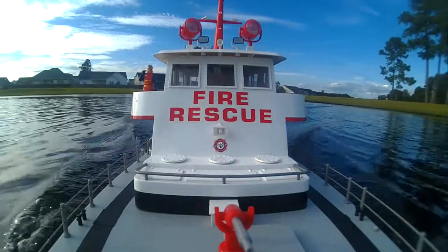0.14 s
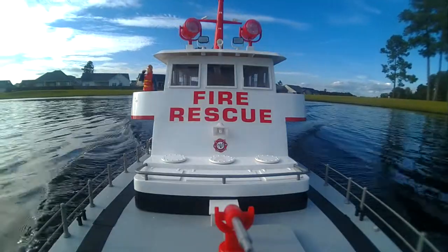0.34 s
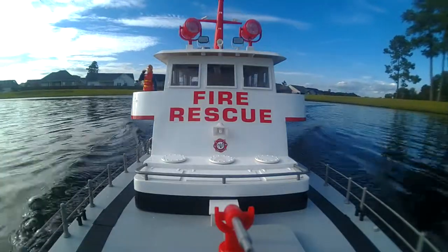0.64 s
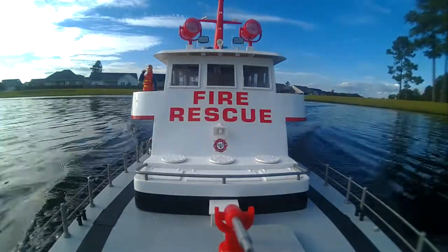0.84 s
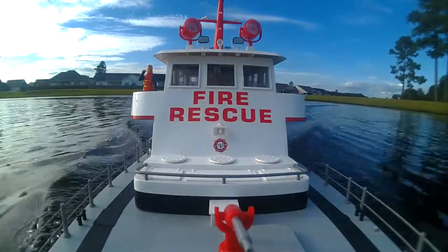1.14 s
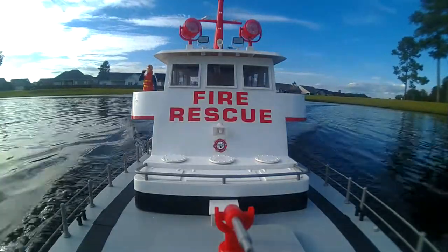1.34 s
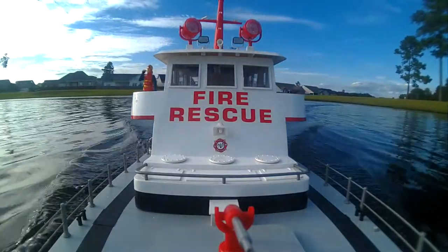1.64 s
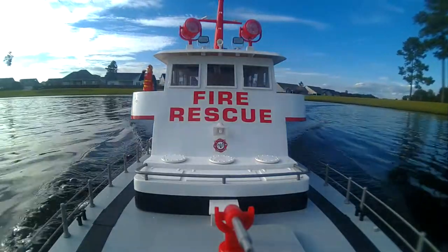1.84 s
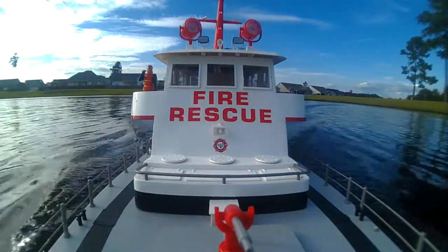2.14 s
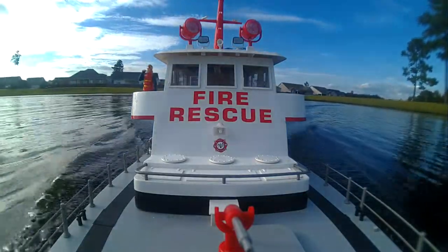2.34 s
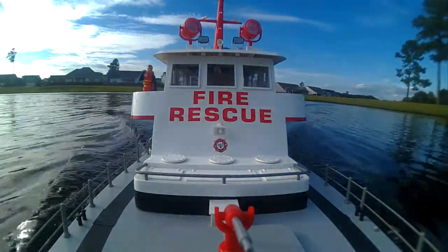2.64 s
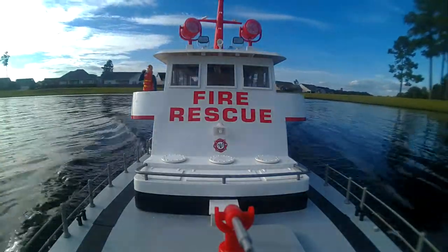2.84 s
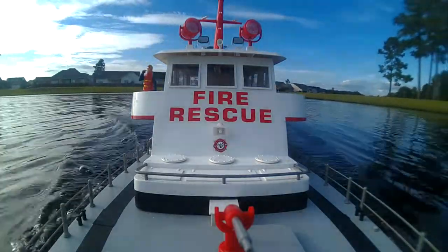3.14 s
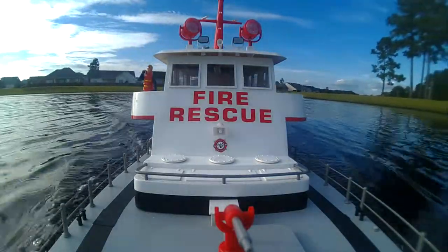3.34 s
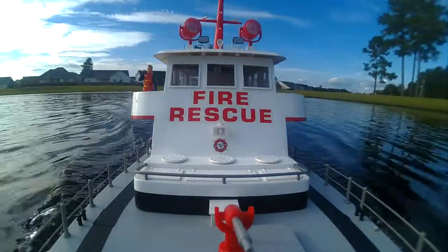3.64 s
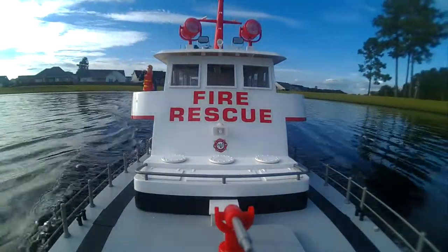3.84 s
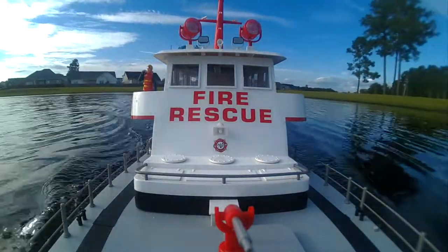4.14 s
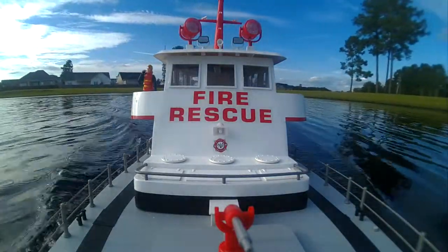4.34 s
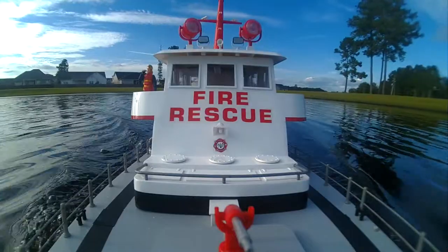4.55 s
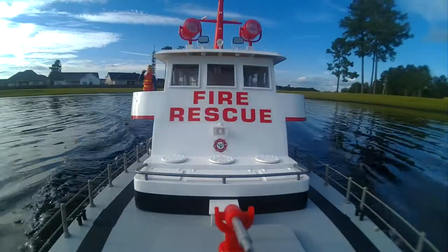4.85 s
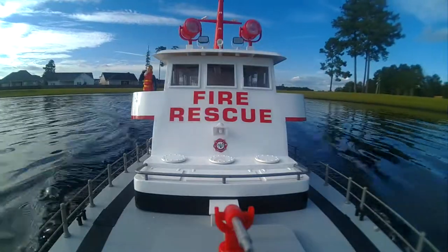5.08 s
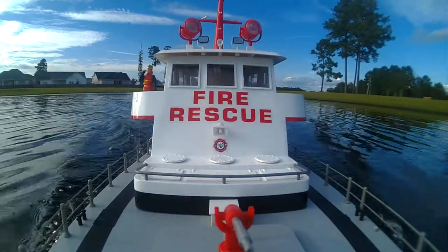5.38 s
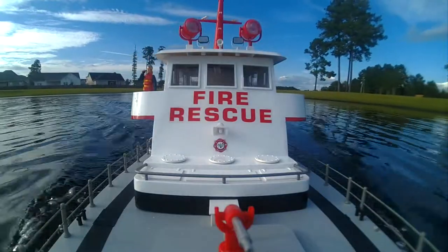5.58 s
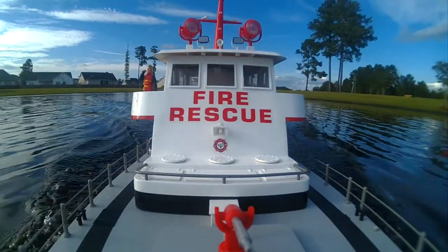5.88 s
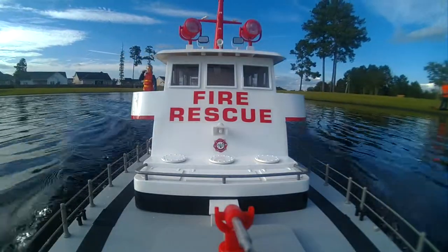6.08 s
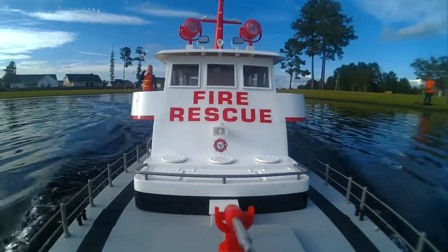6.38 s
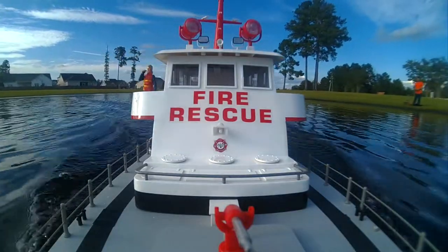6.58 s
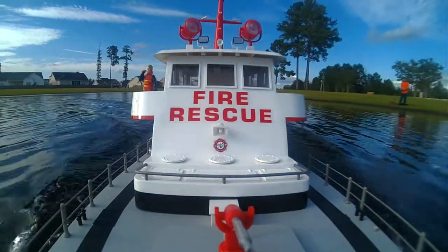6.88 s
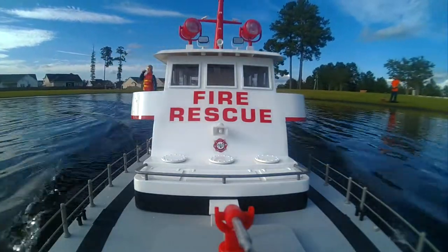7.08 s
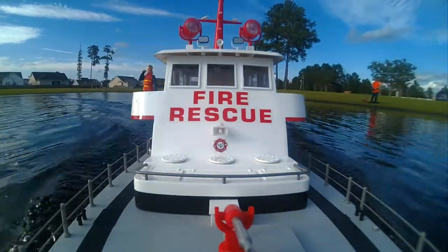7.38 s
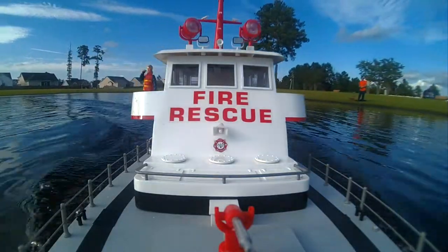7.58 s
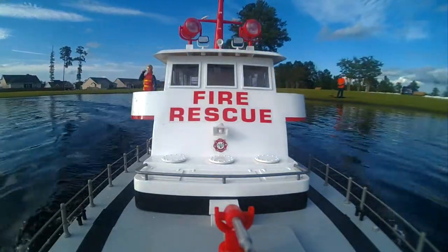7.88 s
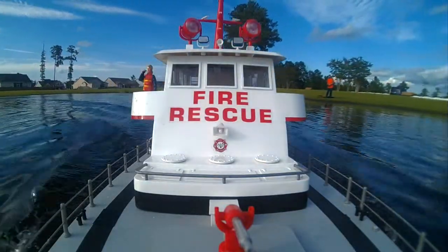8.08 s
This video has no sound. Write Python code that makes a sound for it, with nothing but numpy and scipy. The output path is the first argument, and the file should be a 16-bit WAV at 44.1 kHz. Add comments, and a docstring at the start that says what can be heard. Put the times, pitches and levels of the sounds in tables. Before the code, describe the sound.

A very close, dry outdoor sound from the deck of a model boat moving on a pond. From 0 to 1.7 seconds a small electric motor runs at steady low speed: a piercing fixed whine near 2 kHz, a buzzing hum around 90 turns per second, brushy hiss, and even metallic chatter in short spells, with a few hard knocks between 0.7 and 0.95. From about 1.75 the throttle opens; the hum rises, peaking near 2.7 to 3 seconds with a low boom, while the whine keeps its pitch and softens somewhat. The rattle turns loose and ragged, with irregular hard knocks. A faint drop ticks at 2.6. From 3.4 to 7.5 the speed settles slightly lower, wavering, still rattling and knocking over gently surging water wash. Near 8 seconds the hum climbs again as the sound ends, still running.

```python
"""An evenly chattering shaft and a steady whine are heard first, on the deck of a model boat on a pond.
As the throttle opens around two seconds, the hum rises and the rattle turns loose, with hard knocks.
Rattle and knocks are impulses and scraping noise sent through hull resonances; the whine is a fixed
chopping tone with commutator sidebands; hums are sines locked to the shaft's turns.
Noise shaped in colour and slowly varied in level gives water along the sides; one drop hits the deck."""
import sys
import numpy as np
from scipy import signal
from scipy.fft import rfft, irfft, next_fast_len
from scipy.io import wavfile
from scipy.ndimage import uniform_filter1d

SR = 44100
rng = np.random.default_rng(int(sys.argv[2]) if len(sys.argv) > 2 else 0)


def transcribe(signal):
    """Save signal, clipped to [-1, 1], as a 16-bit WAV file at the path in sys.argv[1]."""
    frames = np.atleast_2d(signal).T
    limited = np.clip(frames, -1, 1)
    pcm = np.round(limited * 32767).astype(np.int16)
    wavfile.write(sys.argv[1], SR, pcm)


N = 362502
TIME = np.arange(N) / SR   # s
SIZE = 2 * next_fast_len(N // 2 + 8192)   # transform length, with room for ringing
BINS = np.maximum(np.arange(SIZE // 2 + 1) * SR / SIZE, 1)   # Hz

# faint electronic hiss, relative density: frequency_hz, level_db (per Hz)
HISS_SPECTRUM = [(5000, -13), (6000, -25), (6700, -2), (8000, -20), (10000, -0.5), (13000, 0), (15500, -4)]
# water and air along the hull, relative density: frequency_hz, level_db (per Hz)
WASH_SPECTRUM = [(25, -15), (42, -12), (60, -1), (80, -6.5), (140, -9), (220, 6), (280, -18.5), (390, 5),
                 (480, -4), (750, 2.5), (1800, -0.5), (2400, -6), (3700, -16), (5500, -53.5)]
# a drop hits the deck: time_s, peak_db
DECK_DROPS = [(2.6135, -40)]
# wavering tones of the drive line, off the shaft's orders:
# multiple (of the shaft rate), low_speed_db, cruise_db
DRIVE_LINE_TONES = [(2.44, -64, -65), (3.06, -71, -63), (3.27, -68, -56), (3.48, -60, -57.5),
                    (3.71, -55, -55.5)]
# resonances of the motor can, relative levels: centre_hz, width_hz, level_db
CAN_MODES = [(2543, 180, -15), (2625, 90, -2), (2722, 89, 3.5), (2860, 180, -11.5), (3140, 140, -13),
             (3377, 150, -11.5), (3714, 220, -22), (4365, 180, -33.5), (4700, 360, -37)]
# brief swells of the rubbing: centre_s, half_length_s, rise_db
RUBBING_SWELLS = [(.81, .04, 2.5), (3.181, .09, 3.5)]
# rotation of the shaft: time_s, speed_turns_per_s
SHAFT_SPEED = [(0.1, 88.5), (0.16, 88.4), (1.21, 88.4), (1.43, 89.6), (1.73, 89.6), (1.86, 93.7),
               (2.11, 96.9), (2.5, 99.8), (2.7, 103.3), (2.99, 102.8), (3.4, 98.8), (3.79, 98.8),
               (4.01, 97.0), (4.69, 96.9), (5.39, 99.3), (5.91, 97.8), (6.5, 97.0), (7.5, 98.1),
               (8.15, 102.4), (8.22, 102.1)]
# once-a-turn hum of the unbalance: speed_turns_per_s, level_db
UNBALANCE_LEVEL = [(95.5, -51), (97.5, -60), (99, -60.5), (101, -57.5)]
# higher shaft orders: multiple (of the shaft rate), low_speed_db, cruise_db, chatter_rise_db
SHAFT_ORDERS = [(3, -70, -74, 0), (4, -57, -69, 0), (6, -72, -61, 5.5), (7, -68, -58, 0), (8, -62, -68, 12),
                (9, -50.5, -50, 0), (10, -55, -64, 2), (12, -52, -53, 7), (15, -44, -49, 11),
                (17, -47, -54, 5), (31, -58, -60, 9)]
# level of the controller's chopping tone: time_s, level_db
WHINE_LEVEL = [(0.05, -31.5), (1.48, -31), (2.57, -34), (3.51, -38.5), (3.6, -36), (5.65, -35), (7.38, -36),
               (8.22, -39.5)]
# commutation sidebands of the whine:
# multiple (of the chopping rate), offset (shaft orders), low_speed_db, cruise_db
WHINE_SIDEBANDS = [(1, -3, -44, -42.5), (1, -2, -56, -55), (1, -1, -60.5, -63), (1, 2, -59.5, -52),
                   (1, 3, -56, -62.5), (2, -3, -60.5, -58.5), (2, -2, -84, -69.5), (2, -1, -80, -76.5),
                   (2, 2, -91.5, -77.5)]
# spells at low speed that catch the shaft in even chatter: start_s, end_s, rattle_rise_db
CHATTER_SPELLS = [(-.03, .022, 4.6), (.1, .43, 3.9), (.515, .66, 4.4), (.69, .955, 4.2), (1.03, 1.21, 5.5),
                  (1.3, 1.55, 5.5), (1.61, 1.82, 4.4)]
# resonances of hull and motor mount, relative levels: centre_hz, width_hz, level_db
HULL_MODES = [(317, 35, -20), (693, 232, -20.5), (820, 210, -25.5), (1016, 60.4, -5), (1164, 220, -14),
              (1278, 90, -3.5), (1351.7, 114, 2.5), (1446, 110, -3.5), (1606, 140, -22.5),
              (1891, 98, -21.5), (2160, 120, -25), (2726, 190, -20), (3160, 410, -25), (4810, 630, -50)]
# the hardest knocks of the shaft on its tube: time_s, peak_db
HARD_KNOCKS = [(0.6953, -14), (0.7928, -10), (0.8934, -12), (0.9412, -11.5), (1.914, -16), (1.9553, -12.5),
               (2.0847, -12.5), (2.137, -16), (2.717, -15), (3.0363, -16), (3.5573, -17), (3.6592, -18),
               (3.8014, -13.5), (3.995, -14), (4.0866, -17.5), (4.1584, -16), (4.2, -17), (4.3126, -18.5),
               (4.353, -17), (4.3848, -15), (4.755, -15.5), (4.9181, -13.5), (5.2227, -16.5), (5.2545, -17),
               (5.3652, -15), (5.8711, -19.5), (6.2103, -16.5), (6.4651, -14), (6.506, -18), (6.8561, -17),
               (6.9062, -16.5), (6.9972, -18), (7.0295, -17), (7.0587, -16)]

CHOP_HZ, WHISTLE_HZ, CUTOFF_HZ = 1943.5, 14800, 15700
# as it speeds up the shaft works loose, rattles worst, then runs smoother (turns per s)
LOOSENS_AT, LOOSE_AT, ROUGHEST_AT, SMOOTH_AT = 90, 96, 97.5, 101
# the propeller's twice-a-turn hum, and its boom at a resonance of the deck
BLADE_DB, BOOM_DB, BOOM_HZ, BOOM_WIDTH_HZ = -55.5, -34, 203.5, 16.5
# octave of the whine at low and at cruising speed
OCTAVE_DB, OCTAVE_CRUISE_DB = -62.5, -55.5
# the loose rattle, and its fall past the roughest rate (dB per turn per s)
RATTLE_DB, SMOOTHING_DB = -28, 0.5
# rubbing of brushes and bearings, and its rise during chatter
RUB_DB, RUB_CHATTER_DB = -38, 2
# chance knocks once the shaft is fully loose: rate (per s), peak level before smoothing
KNOCKS_PER_S, KNOCK_DB = 3.0, -20
# lag of the chatter behind the shaft in a spell: mean and spread (turns per s)
CHATTER_LAG, CHATTER_WANDER = .55, .35


def from_db(db):
    """Logarithmic level: decibels become an amplitude gain."""
    return 10 ** (np.asarray(db) / 20)


def rms_one(x):
    """Normalization: a signal is scaled to unit mean power."""
    return x / np.sqrt(np.mean(x ** 2) + 1e-20)


def evened(x):
    """Short-time normalization: unit power over a fifth of a second leaves single blows standing."""
    return x / np.sqrt(uniform_filter1d(x ** 2, size=SR // 5) + 1e-12)


def in_time(rows):
    """Linear interpolation: the second column of a curve at every sample."""
    time_s, values = np.transpose(rows)
    return np.interp(TIME, time_s, values)


def drift(corner_hz):
    """Low-passed chance: white noise through two equal poles wanders slowly, with spread 1."""
    step = 40   # samples between the computed points
    pole = np.exp(-2 * np.pi * step * corner_hz / SR)
    noise = rng.standard_normal(N // step + 2002)
    slow = signal.lfilter([1], [1, -2 * pole, pole * pole], noise)[2000:]   # settled part
    return np.interp(np.arange(N) / step, np.arange(len(slow)), rms_one(slow))


def between(low_db, cruise_db, cruise):
    """Linear blend: a level moves from its low-speed to its cruising value."""
    return low_db + cruise * (cruise_db - low_db)


def tone(level_db, cycles):
    """Sinusoid: its phase is counted in cycles and its level is effective (rms)."""
    return np.sqrt(2) * from_db(level_db) * np.sin(2 * np.pi * cycles)


def coloured_noise(spectrum):
    """Spectral shaping: white noise takes a given colour, at unit power."""
    hz, db = np.transpose(spectrum)
    gain = from_db(np.interp(np.log(BINS), np.log(hz), db))
    white = rfft(rng.standard_normal(SIZE))
    return rms_one(irfft(white * gain)[:N])


def resonance(hz, centre_hz, width_hz):
    """Resonance: a steep-sided power response, 1 on top; half-power width is 0.76 of width_hz."""
    return 1 / (1 + ((hz - centre_hz) / (0.76 * width_hz)) ** 2) ** 3.08


def body(modes):
    """Causality: resonances add in power and get minimum phase, so they ring only after a blow."""
    power = sum(from_db(db) ** 2 * resonance(BINS, hz, width) for hz, width, db in modes)
    # folding the cepstrum onto positive times gives the minimum phase
    cepstrum = irfft(np.log(power) / 2)
    cepstrum[1:SIZE // 2] *= 2
    cepstrum[SIZE // 2 + 1:] = 0
    return np.exp(rfft(cepstrum))


def through(force, response):
    """Linear response: the force spectrum is multiplied by the body's response."""
    return irfft(rfft(force, SIZE) * response)[:N]


def clicks(times, sizes):
    """Impulse: each blow occupies one sample at its time."""
    samples = np.clip(np.round(times * SR).astype(int), 0, N - 1)
    return np.bincount(samples, sizes, N)


def strike(events, response):
    """Impulse response: each blow on a body rings up to its peak level."""
    times, peak_db = np.transpose(events)
    ringing = through(clicks(times, from_db(peak_db)), response)
    return ringing / np.abs(irfft(response)).max()


def electronic_hiss(level_db=-78):
    """Broadband noise: a faint steady hiss of the electronics."""
    return from_db(level_db) * coloured_noise(HISS_SPECTRUM)


def electronic_whistle(level_db=-88):
    """Pure tone: a faint steady whistle of the electronics."""
    return tone(level_db, WHISTLE_HZ * TIME)


def water_wash(level_db=-46, surge_db=3.5):
    """Turbulence: the bow wave washes by as coloured noise that surges slowly."""
    return from_db(level_db + surge_db * drift(2.6)) * coloured_noise(WASH_SPECTRUM)


def deck_drop():
    """Impact: a drop thrown by the bow wave excites two high resonances of the deck."""
    deck = body([(4100, 350, -1.5), (4700, 400, -10)])   # centre_hz, width_hz, level_db
    return strike(DECK_DROPS, deck)


def drive_line(turns, cruise, waver_db=1.5, slip_hz=1.5):
    """Rolling slip: bearings slip a little, so their tones wander off fixed multiples of the shaft."""
    out = np.zeros(N)
    for multiple, low_db, cruise_db in DRIVE_LINE_TONES:
        slipped = np.cumsum(slip_hz * drift(5)) / SR
        cycles = multiple * turns + slipped + rng.random()
        out += tone(between(low_db, cruise_db, cruise) + waver_db * drift(3.6), cycles)
    return out


def scrape(hits, slide_s, steady):
    """Sliding friction: noise follows a pressure that decays after each contact, over a steady part."""
    decay = np.exp(-1 / (slide_s * SR))
    pressure = evened(signal.lfilter([1], [1, -decay], hits))
    return (pressure + steady) * rng.standard_normal(N)


def brushes(hits, grip, waver_db=0.57):
    """Friction noise: rubbing makes the motor can hiss, more while the shaft chatters."""
    swell_db = sum(db * np.exp(-((TIME - s) / half_s) ** 2) for s, half_s, db in RUBBING_SWELLS)
    rub_db = RUB_DB + RUB_CHATTER_DB * grip + swell_db + waver_db * drift(4)
    rubbing = scrape(hits, slide_s=0.0036, steady=1.7)
    return from_db(rub_db) * evened(through(rubbing, body(CAN_MODES)))


def unbalance_hum(speed, turns):
    """Rotating unbalance: one cycle per turn, at a level set by the speed."""
    return tone(np.interp(speed, *np.transpose(UNBALANCE_LEVEL)), turns)


def propeller_hum(speed, turns):
    """Forced resonance: the twice-a-turn hum booms as it climbs into a resonance of the deck."""
    boom_power = from_db(BOOM_DB) ** 2 * resonance(2 * speed, BOOM_HZ, BOOM_WIDTH_HZ)
    level_db = 10 * np.log10(from_db(BLADE_DB) ** 2 + boom_power)
    return tone(level_db, 2 * turns)


def shaft_orders(speed, turns, contact_turns, cruise, grip, hull, waver_db=2.54):
    """Harmonic series: higher orders pass through the hull, and some swell when the shaft chatters."""
    hull_phase = np.unwrap(np.angle(hull))
    out = np.zeros(N)
    for multiple, low_db, cruise_db, chatter_db in SHAFT_ORDERS:
        level_db = between(low_db, cruise_db, cruise) + grip * chatter_db + waver_db * drift(14)
        # orders changed by the chatter keep step with the contacts
        cycles = multiple * (contact_turns if chatter_db else turns)
        hull_cycles = np.interp(multiple * speed, BINS, hull_phase) / (2 * np.pi)
        out += tone(level_db, cycles + hull_cycles + .25)   # a quarter cycle makes a cosine
    return out


def chopping_whine(cruise, waver_db=0.63):
    """Magnetic force: chopped current sings in the windings at a fixed pitch and its octave."""
    chops = CHOP_HZ * TIME
    whine = tone(in_time(WHINE_LEVEL) + waver_db * drift(11), chops)
    return whine + tone(between(OCTAVE_DB, OCTAVE_CRUISE_DB, cruise), 2 * chops)


def commutator_sidebands(turns, cruise, waver_db=1.04):
    """Modulation: the turning commutator puts tones at shaft orders on either side of the whine."""
    out = np.zeros(N)
    for multiple, offset, low_db, cruise_db in WHINE_SIDEBANDS:
        cycles = multiple * CHOP_HZ * TIME + offset * turns + rng.random()
        out += tone(between(low_db, cruise_db, cruise) + waver_db * drift(6.8), cycles)
    return out


def chatter_spells():
    """Intermittent contact: grip (1 in even chatter, 0 when loose) and the rise in dB it brings."""
    inside = np.array([(TIME > start) & (TIME < end) for start, end, _ in CHATTER_SPELLS], float)
    eased = uniform_filter1d(inside, size=SR // 40)
    spell_rise_db = np.array(CHATTER_SPELLS)[:, 2]
    return eased.sum(axis=0), spell_rise_db @ eased


def smoothing_db(speed):
    """Self-centring: past its roughest rate the shaft hits more softly."""
    return -SMOOTHING_DB * np.clip(speed - ROUGHEST_AT, 0, SMOOTH_AT - ROUGHEST_AT)


def contacts(turns, grip, loose_jitter_s=.0004, back_side_db=-12):
    """Whirl: the shaft hits its tube twice a turn; when loose it leans and whirls every five turns or so."""
    jitter_s, spread_db, whirl_db = .00017, 1.8, 2.0
    half_turns = np.arange(int(2 * turns[-1]))
    late, force, slip = rng.standard_normal((2000, 3))[:len(half_turns)].T
    times = np.interp(half_turns / 2, turns, TIME)
    lean = 1 - np.interp(times, TIME, grip)
    whirl = np.sin(2 * np.pi * np.cumsum(.105 + .03 * slip))   # cycles per half turn
    lean_db = whirl_db * whirl + back_side_db * (half_turns % 2)
    level_db = spread_db * np.minimum(force, 1) + lean * lean_db
    late_s = (jitter_s + loose_jitter_s * lean) * late
    return clicks(times + late_s, from_db(level_db))


def knocks(speed, turns, cruise, spread_db=0.5):
    """Random impacts: rows (time_s, peak_db) of hard knocks and of chance ones on turns of the loose shaft."""
    starts = np.flatnonzero(np.diff(np.floor(turns)))   # first samples of the turns
    luck, force = rng.random((2000, 2))[:len(starts)].T
    struck = luck < KNOCKS_PER_S * cruise[starts] / speed[starts]
    peak_db = KNOCK_DB + smoothing_db(speed[starts]) + spread_db * (2 * force - 1)
    chance_knocks = np.column_stack([TIME[starts], peak_db])[struck]
    return np.vstack([HARD_KNOCKS, chance_knocks])


def free_flight(blows, dip_db=-4):
    """Loss of contact: around a knock the shaft swings clear of its tube and rattles less."""
    times = blows[:, 0]
    near = signal.fftconvolve(clicks(times, np.ones(len(times))), np.hanning(SR // 45), "same")
    return from_db(dip_db * np.clip(near, 0, 1))


def rattle(hits, blows, speed, grip, rise_db, hull, waver_db=.5):
    """Forced vibration: contacts, scraping and knocks ring in the hull; a loose shaft scrapes more."""
    level_db = RATTLE_DB + smoothing_db(speed) + rise_db + waver_db * drift(3.9)
    scrape_db = -2 - 6 * grip   # relative to the contacts
    scraping = rms_one(scrape(hits, slide_s=0.0052, steady=.8))
    force = evened(hits) + from_db(scrape_db) * scraping
    gain = from_db(level_db) * free_flight(blows)
    return gain * evened(through(force, hull)) + strike(blows, hull)


def scene():
    """Superposition: one shaft drives hum, sidebands and rattle, over water and faint electronics."""
    speed = in_time(SHAFT_SPEED)
    turns = np.cumsum(speed * (1 + .001 * drift(8))) / SR
    # 0 at low speed, 1 with the throttle open
    cruise = np.interp(speed, [LOOSENS_AT, LOOSE_AT], [0, 1])
    grip, rise_db = chatter_spells()
    lag = grip * (CHATTER_LAG + CHATTER_WANDER * drift(8))
    contact_turns = turns - np.cumsum(lag) / SR
    hull = body(HULL_MODES)
    hits = contacts(contact_turns, grip)
    blows = knocks(speed, turns, cruise)

    background = electronic_hiss() + electronic_whistle() + water_wash() + deck_drop()
    motor = brushes(hits, grip) + chopping_whine(cruise) + commutator_sidebands(turns, cruise)
    hum = unbalance_hum(speed, turns) + propeller_hum(speed, turns) + drive_line(turns, cruise)
    hum += shaft_orders(speed, turns, contact_turns, cruise, grip, hull)
    return (background + motor + hum + rattle(hits, blows, speed, grip, rise_db, hull))[None]


def record(dry):
    """Band limiting: a steep elliptic low-pass cuts the top."""
    low_pass = signal.ellip(10, .1, 80, CUTOFF_HZ, fs=SR, output="sos")   # ripple and rejection in dB
    return signal.sosfilt(low_pass, dry)


dry = scene()
out = record(dry)
transcribe(out)
```